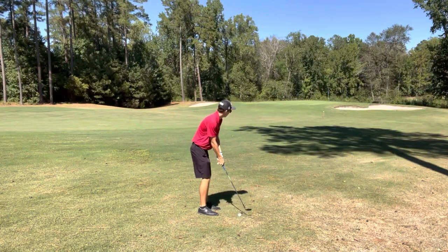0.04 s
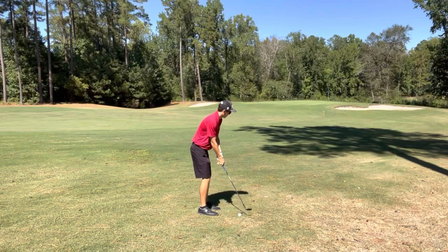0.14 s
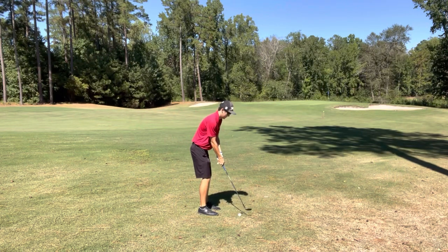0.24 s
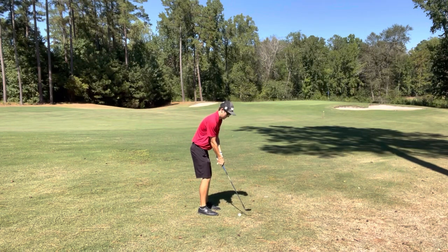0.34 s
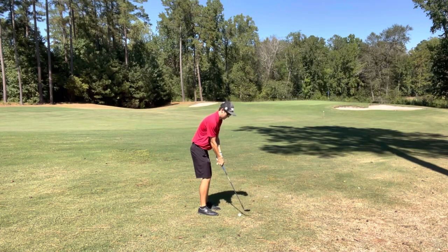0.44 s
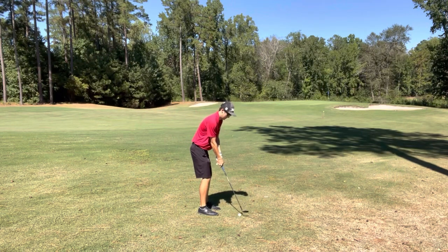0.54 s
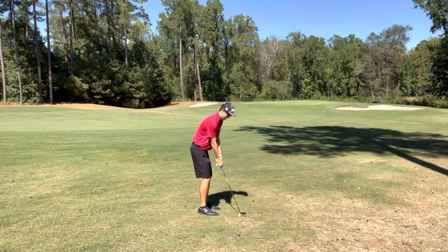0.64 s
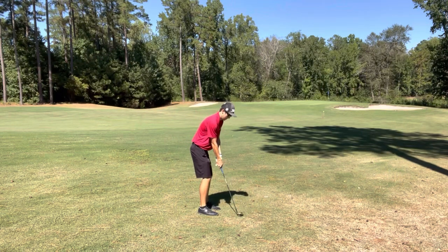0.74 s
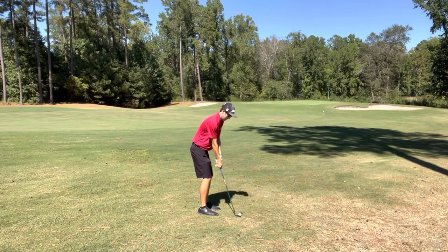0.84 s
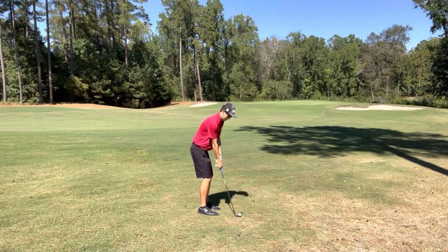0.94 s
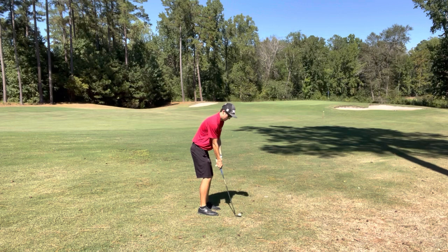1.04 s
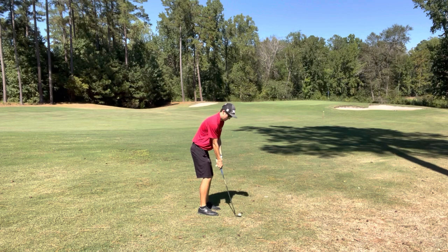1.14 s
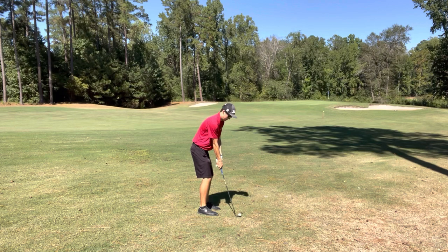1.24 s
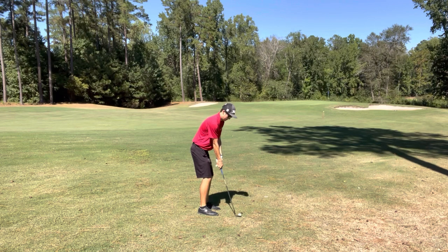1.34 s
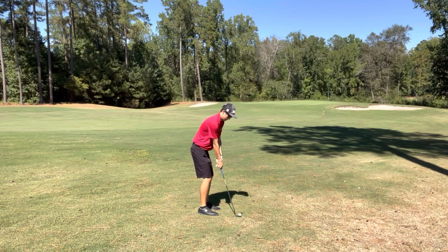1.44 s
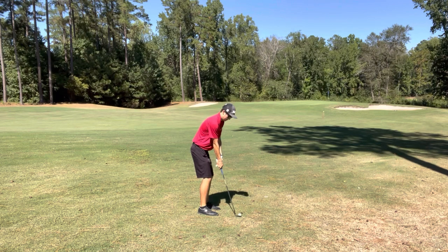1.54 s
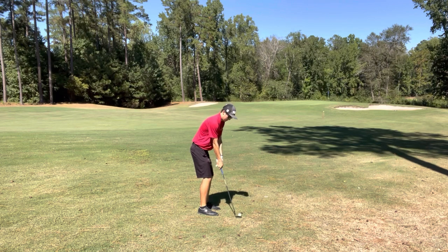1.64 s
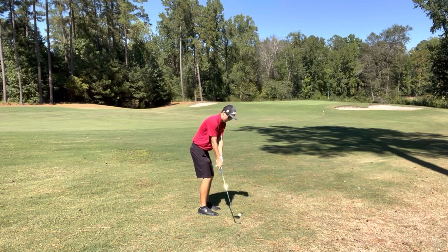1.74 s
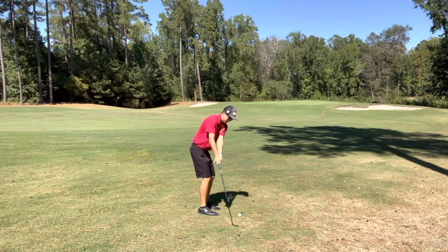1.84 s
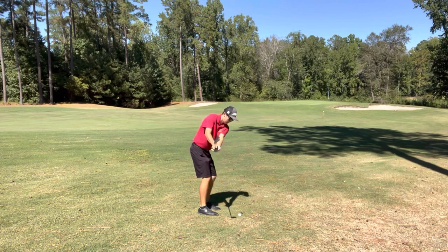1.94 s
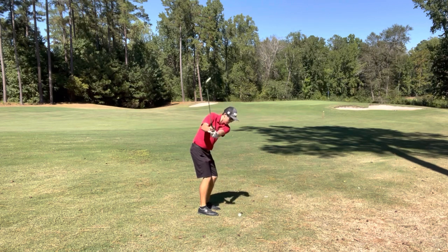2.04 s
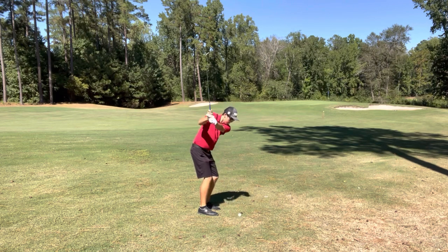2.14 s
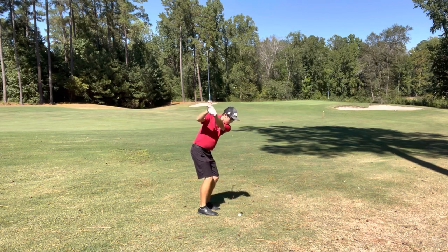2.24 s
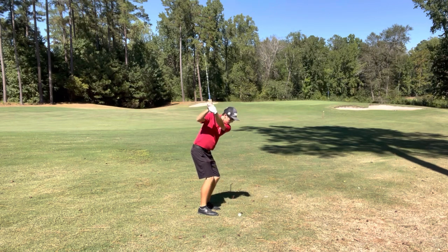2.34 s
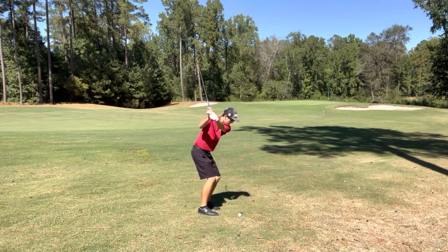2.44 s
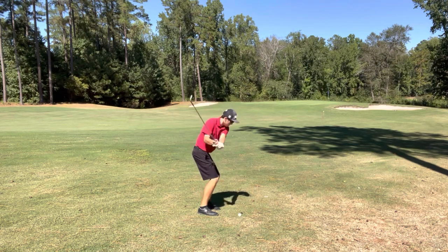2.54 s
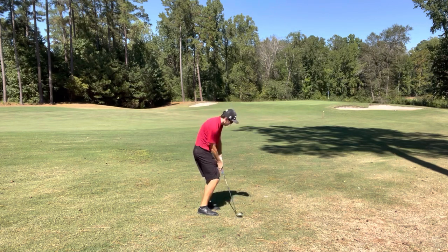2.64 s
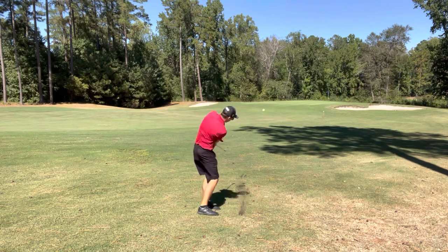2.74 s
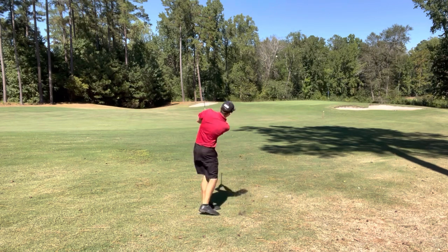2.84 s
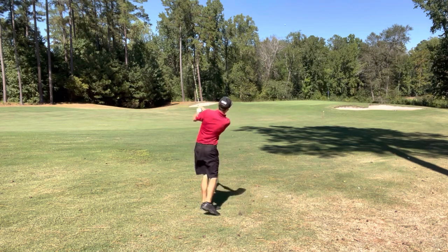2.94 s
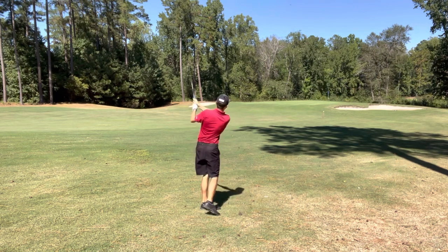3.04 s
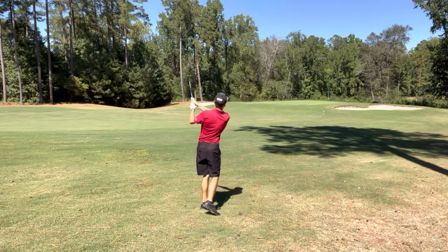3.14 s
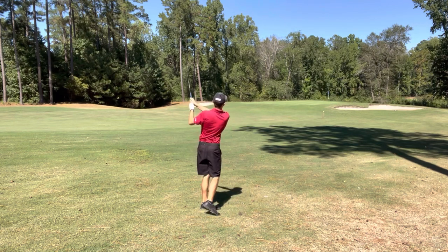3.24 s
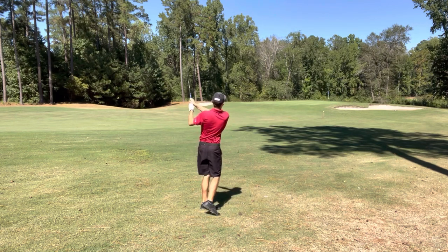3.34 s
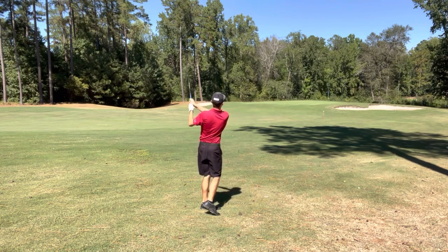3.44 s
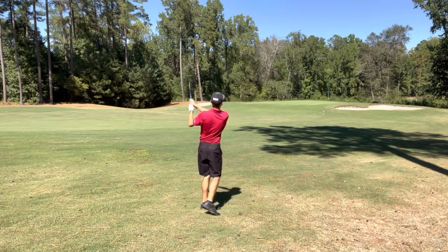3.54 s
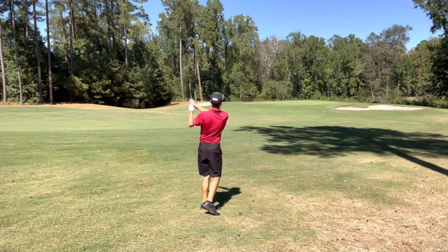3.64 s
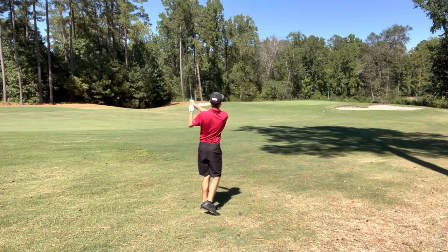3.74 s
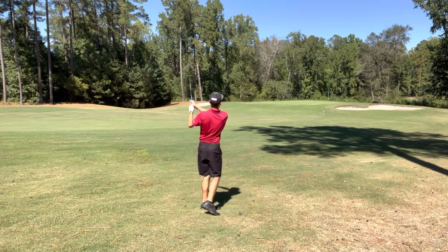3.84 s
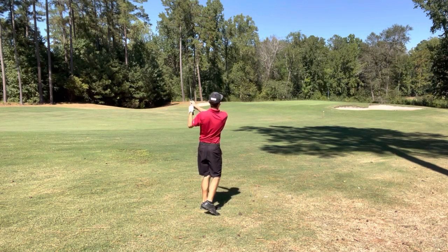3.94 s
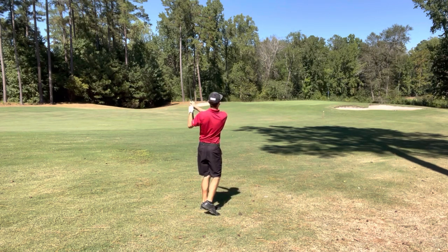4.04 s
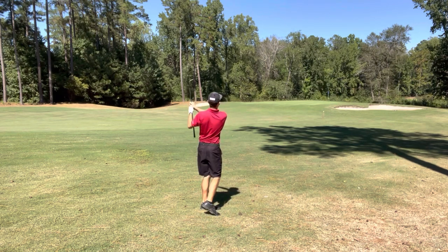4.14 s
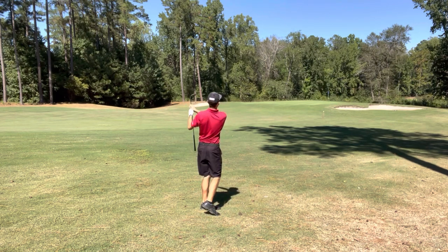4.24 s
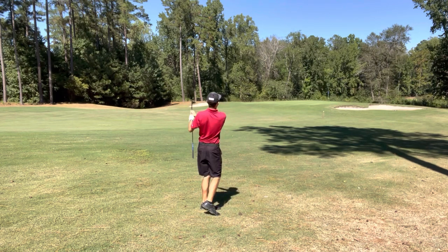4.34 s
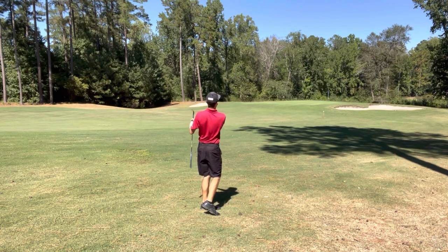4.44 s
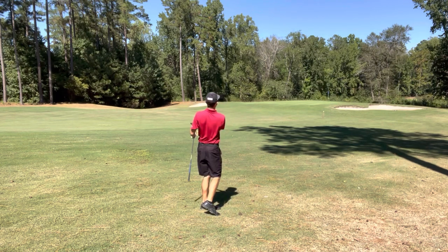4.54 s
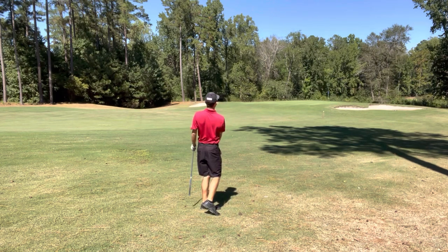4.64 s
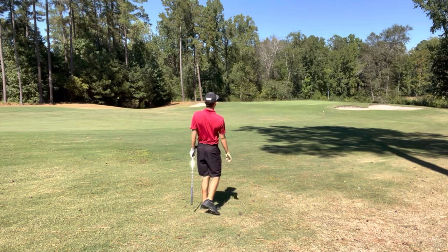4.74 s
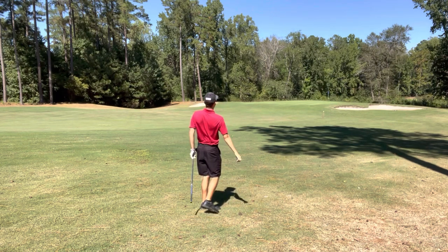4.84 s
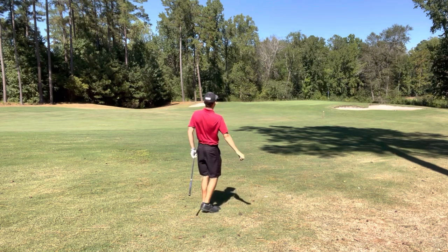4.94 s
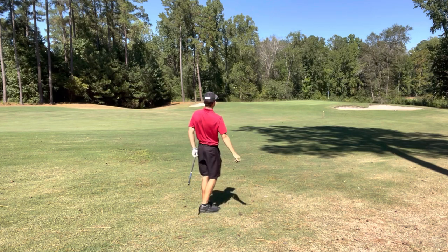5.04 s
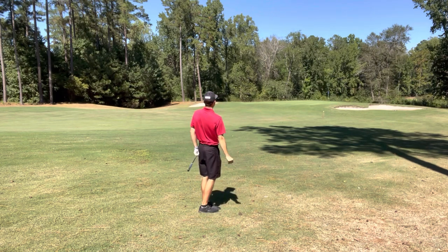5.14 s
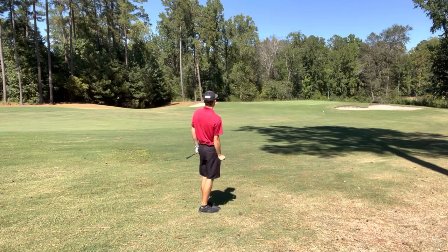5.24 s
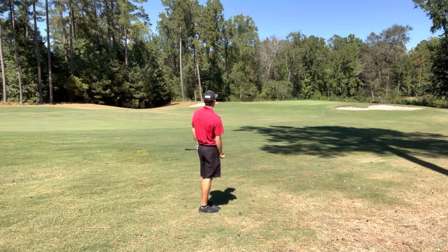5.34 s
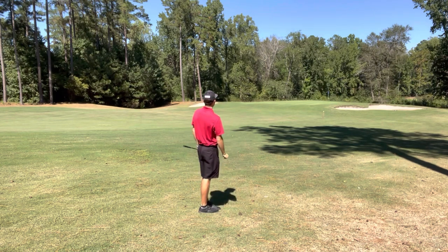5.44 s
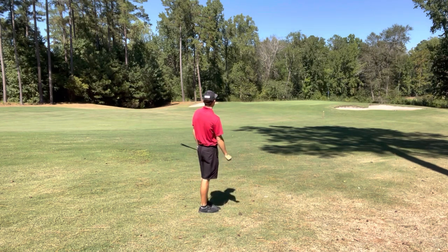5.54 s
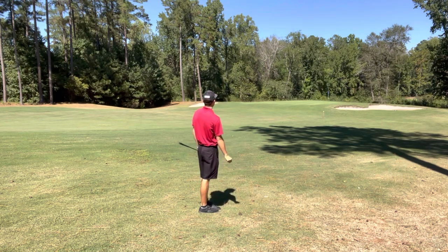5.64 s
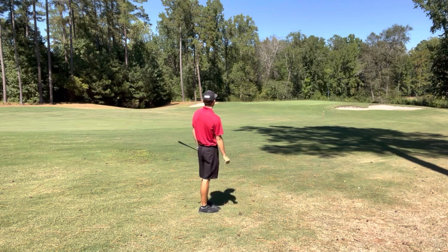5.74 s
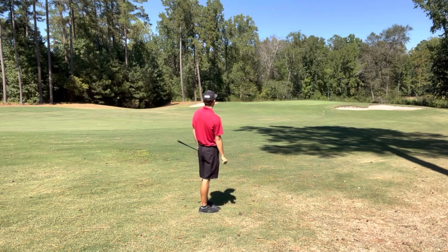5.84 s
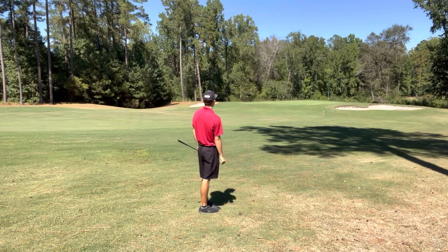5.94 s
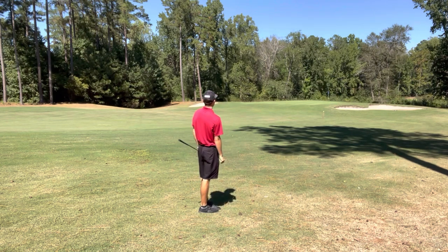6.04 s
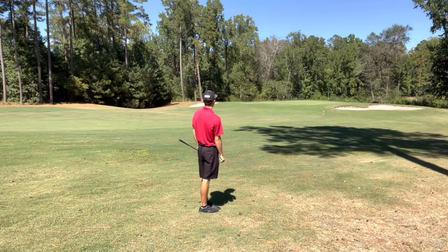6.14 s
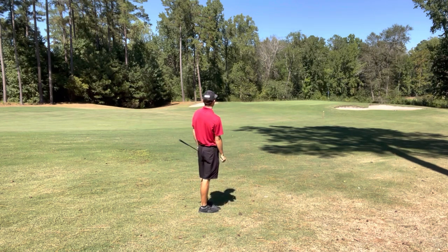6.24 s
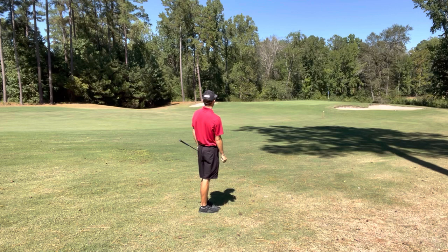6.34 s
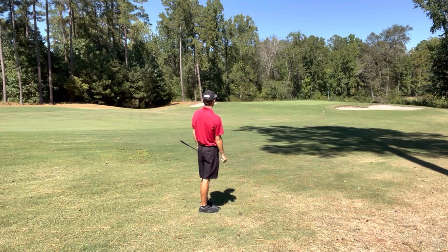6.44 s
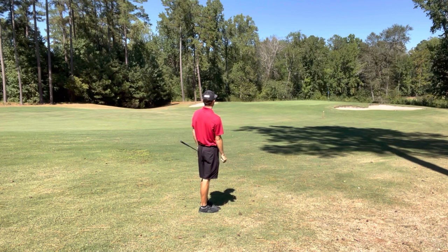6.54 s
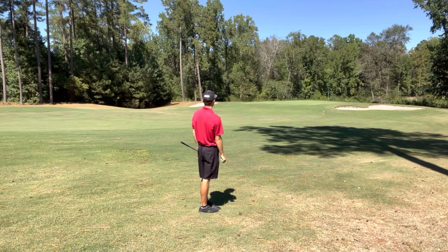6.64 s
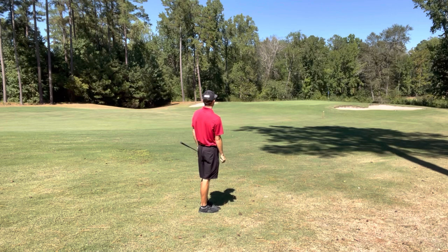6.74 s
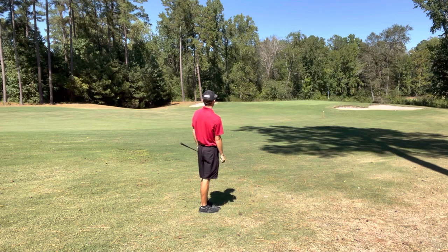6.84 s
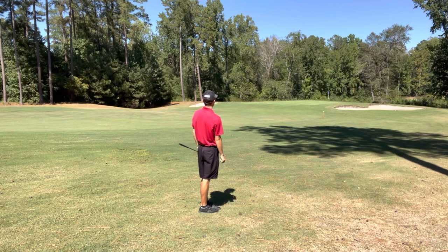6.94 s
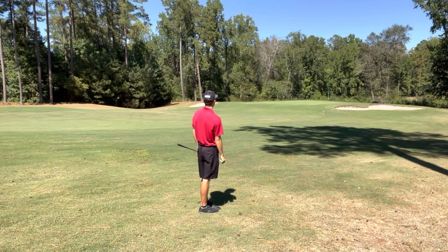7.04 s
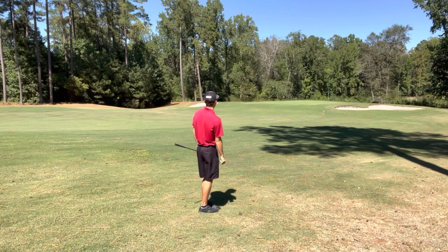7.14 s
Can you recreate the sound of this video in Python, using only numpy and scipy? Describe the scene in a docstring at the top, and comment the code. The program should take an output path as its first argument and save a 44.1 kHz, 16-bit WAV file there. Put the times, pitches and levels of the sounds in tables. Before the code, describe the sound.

A golf iron cracks a ball off turf with a sharp metallic click and brief swish, over low road hum, insect hiss and distant birds.

```python
"""Golf shot on an open fairway

An iron strikes a ball off the turf a few metres from a phone: short pushes ring decaying modes.
The swish, turf spray and rustles are shaped noise; later the shaft slaps into the golfer's hand.
Birds whistle and chirp far off as fluttering sines, smeared by echoes among the trunks.
Insects hiss in the trees and leaves in the breeze as flickering noise; behind them lies road hum,
and two distant engines drone as low tones with an octave."""
import sys
import numpy as np
from scipy import signal
from scipy.fft import rfft, irfft
from scipy.io import wavfile
from scipy.ndimage import uniform_filter1d

SR = 44100
rng = np.random.default_rng(int(sys.argv[2]) if len(sys.argv) > 2 else 0)


def pcm_store(signal):
    """Save signal as 16-bit PCM."""
    levels = np.round(np.clip(np.atleast_2d(signal), -1, 1) * 32767)
    wavfile.write(sys.argv[1], SR, levels.astype(np.int16).T)


N = 317520


def undb(db):
    """Decibel law: 20 dB is a factor of ten in amplitude."""
    return 10 ** (np.asarray(db) / 20)


def level(x, db):
    """Root-mean-square measure: scale a signal to an rms level."""
    return x * undb(db) / np.sqrt(np.mean(x ** 2))


def curve(rows):
    """Linear interpolation: the columns of a timed table, sample by sample."""
    time_s, *columns = np.transpose(rows)
    return [np.interp(np.arange(N) / SR, time_s, column) for column in columns]


def coloured(points, size):
    """Spectral shaping: white noise filtered to (freq_hz, density_db) points, then set to rms 1."""
    point_hz, point_db = np.transpose(points)
    freq_hz = np.maximum(np.fft.rfftfreq(size, 1 / SR), 1)
    gain = undb(np.interp(np.log(freq_hz), np.log(point_hz), point_db))
    white = rng.standard_normal(size)
    return level(irfft(rfft(white) * gain, size), 0)


def walk(rate):
    """Slow random modulation: levels held 1 / rate s and slewed twice, with a spread near 1."""
    hold = int(SR / rate)
    steps = np.repeat(rng.standard_normal(N // hold + 1), hold)
    return 1.253 * uniform_filter1d(uniform_filter1d(steps, hold), hold)[:N]


def bands(points, low_hz, steps, swell_db, flicker_db, rate):
    """Independent modulation: noise bands, `steps` to the octave, flicker alone about swell_db(hz)."""
    spectrum, out = rfft(coloured(points, N)), 0
    place = steps * np.log2(np.maximum(np.fft.rfftfreq(N, 1 / SR), low_hz) / low_hz)
    for k in range(11):
        crossfade = np.cos(np.pi / 2 * np.clip(place - k, -1, 1)) ** 2
        band = irfft(spectrum * crossfade, N)
        out = out + band * undb(swell_db(low_hz * 2 ** (k / steps)) + flicker_db * walk(rate))
    return out


def add(out, x, start_s):
    """Superposition: mix x into out from a start time."""
    i = int(start_s * SR)
    out[..., i:i + x.shape[-1]] += x[..., :N - i]


def stereo(mid, side):
    """Sum and difference: left is mid plus side, right is mid minus side."""
    return np.array([mid + side, mid - side])


# stereo width against frequency, narrowing in the treble: freq_hz, width_db
PORT_WIDTH = [(3000, 0.5), (8000, -5), (13000, -7), (14200, -31)]
PORT_LAG_S = 4.5e-5  # near sounds reach the right port this much before the left


def ports(x):
    """Path difference at two ports: the sum loses 11 kHz, the difference loses the bass."""
    freq_hz = np.fft.rfftfreq(N, 1 / SR)
    turn = np.pi * freq_hz * PORT_LAG_S
    width = undb(np.interp(freq_hz, *np.transpose(PORT_WIDTH)))
    spectrum = rfft(x)
    mid = irfft(spectrum * np.cos(turn), N)
    side = irfft(spectrum * np.sin(turn) * width * -1j, N)
    return stereo(mid, side)


# spectrum of the crack of noise at each contact: freq_hz, density_db
CRACK_COLOUR = [(200, -13), (800, 2), (2500, -1), (5000, -1.5), (6600, -8.5), (8500, 5.5), (11500, -1.5),
                (13500, -4), (15500, -4.5), (16400, -13.5)]
CRACK_T60_S = 0.016


def struck(blows, modes):
    """Modal excitation: a short push rings the modes, neighbours in opposite sense, with a noise crack."""
    out, t = np.zeros(N), np.arange(SR // 4) / SR
    pitch_hz, mode_db, t60_s = np.transpose(modes)[:, :, None]
    rings = undb(mode_db - 60 * t / t60_s) * np.sin(2 * np.pi * pitch_hz * t)
    signs = -(-1) ** np.arange(len(modes))
    for start_s, ring_db, push_ms, crack_db in blows:
        push = np.hanning(int(push_ms * SR / 1000) + 3)
        shares = undb(1.2 * rng.standard_normal(len(modes))) * signs
        ring = np.convolve(shares @ rings, push / push.sum())[:len(t)]
        crack = undb(crack_db - 60 * t / CRACK_T60_S) * coloured(CRACK_COLOUR, len(t))
        add(out, undb(ring_db) * ring + crack, start_s)
    return out


# a faint short sound just before the hit; the club meets the ball, skips through the turf:
# start_s, ring_db, push_ms, crack_db
BLOWS = [(2.6755, -36, .4, -40), (2.6777, -16, .15, -21), (2.6796, -23, .1, -23), (2.6826, -20, .2, -26),
         (2.6844, -25, .3, -30), (2.686, -27, .4, -33)]
# the divot drops back: start_s, ring_db, push_ms, crack_db
DIVOT = [(2.714, -41, .25, -48)]
# ringing of the club head: pitch_hz, level_db, t60_s
CLUB_MODES = [(589, -16.5, 0.02), (769, -3, 0.051), (932, -6, 0.025), (1250, -2, 0.024),
              (1532, -2.5, 0.0215), (1827, 0, 0.0238), (1963, 2.5, 0.011), (2490, -8.5, 0.025),
              (3150, -6.5, 0.022), (4000, -8, .016), (4730, -6, 0.023), (5096, -6, 0.021), (7920, 9, 0.011)]


def club_strike():
    """Impact of a metal body: blows and divot ring one set of heavily damped modes."""
    return struck([*BLOWS, *DIVOT], CLUB_MODES)


# the sole thumps the turf: start_s, ring_db, push_ms, crack_db
THUMP = [(2.6815, -22.5, 1.3, -65)]
# resonances of the ground: pitch_hz, level_db, t60_s
GROUND_MODES = [(111.4, -10.5, 0.068), (166.4, -3, 0.083), (244.6, -5.5, 0.081), (379.4, -2.5, 0.049),
                (518.5, -11, 0.061)]


def turf_thump():
    """Low-pass effect of a long contact: a slow push rings the deep modes of the ground."""
    return struck(THUMP, GROUND_MODES)


# colour of the swish and of the torn turf: freq_hz, density_db
SWISH_COLOUR = [(150, -5), (500, 1), (1500, -8), (3000, -10.5), (9000, -19), (11000, -24), (13500, -20.5),
                (16400, -30)]
SWISH_DB, SWISH_RISE_S = -47.5, 0.045
BURST_DB, BURST_FALL_S, RAIN_DB, RAIN_S = -49, 0.042, -59.5, 0.26


def swish():
    """Turbulence noise: air off the shaft up to the ball, then a burst and a gritty rain of turf."""
    t = np.arange(N) / SR - BLOWS[1][0]  # zero at the ball
    after = np.maximum(t, 0)
    before = undb(SWISH_DB + walk(150)) * np.exp(-(t / SWISH_RISE_S) ** 2)
    burst = undb(BURST_DB) * np.exp(-after / BURST_FALL_S)
    rain = undb(RAIN_DB) * np.exp(-(after / RAIN_S) ** 2)
    shape = np.where(t < 0, before, (burst + rain) * undb(2 * walk(220)))
    near = ports(shape * coloured(SWISH_COLOUR, N))
    spread = undb(-7.5) * shape * coloured(SWISH_COLOUR, N)
    return near + stereo(0, spread)


# the shaft slaps into the hand: start_s, ring_db, push_ms, crack_db
SLAP = [(5.2389, -34, .05, -42)]
# ringing of the shaft: pitch_hz, level_db, t60_s
SHAFT_MODES = [(1660, 2, .012), (2300, 0, .012), (3250, -6, .011), (4880, -2, .009), (6600, -9, .006),
               (8150, 2, .007)]


def shaft_slap():
    """High-pass filtering: the slap keeps its bright ring and little bass."""
    high_pass = signal.butter(3, 1234, "high", fs=SR, output="sos")
    return signal.sosfilt(high_pass, struck(SLAP, SHAFT_MODES))


# small hard ticks of grit and metal: start_s, pitch_hz, level_db, t60_s
TICKS = [(2.7273, 4950, -41, .011), (2.727, 8500, -43, .007), (2.727, 11000, -48, .005),
         (2.727, 13500, -50, .005), (2.921, 8580, -54, 0.014), (3.5947, 9005, -43, .012),
         (3.5947, 13000, -52, .006)]


def ticks():
    """Free vibration of small hard bodies: brief high sines with exponential decay."""
    out, t = np.zeros(N), np.arange(SR // 20) / SR
    onset = 1 - np.exp(-t / 0.0001)
    for start_s, pitch_hz, level_db, t60_s in TICKS:
        decay = undb(level_db - 60 * t / t60_s)
        add(out, decay * onset * np.sin(2 * np.pi * pitch_hz * t), start_s)
    return out


# cloth and grass rustles, timed at the peak:
# peak_s, rise_s, fall_s, level_db, brightness_db (scales the treble points)
RUSTLES = [(1.675, .035, .04, -74, 4), (2.735, .02, .1, -70, 3), (3.6, .015, .06, -72, 3),
           (4.815, .025, .08, -74, 2), (4.96, .1, .05, -70.5, 0)]
RUSTLE_SIDE_DB = -2.5


def rustles():
    """Friction noise: bursts of fine crackle, near 11 kHz chiefly from the sides."""
    out, lead = np.zeros((2, N)), SR // 5
    t = np.arange(-lead, 2 * lead) / SR
    for peak_s, rise_s, fall_s, level_db, tilt_db in RUSTLES:
        front = [(1000, -32.0), (2000, 3.5), (9000, 2.03 * tilt_db), (10500, -16.0),
                 (11800, -24.5), (13000, 3.17 * tilt_db), (16400, -23.0)]
        across = [(1000, -31.0), (2000, -4.5), (12500, 2.63 * tilt_db), (14000, -37.0)]
        swell = np.exp(np.where(t < 0, -(t / rise_s) ** 2, -t / fall_s))
        shape = swell * undb(level_db + 1.5 * walk(300)[:len(t)])
        mid = coloured(front, len(t))
        side = undb(RUSTLE_SIDE_DB) * coloured(across, len(t))
        add(out, shape * stereo(mid, side), peak_s + t[0])
    return out


def note(pitch_hz, gain, rough_db):
    """Scattering in foliage: a near sine whose size and pitch flutter on the way."""
    flutter, waver = (walk(150)[:len(pitch_hz)] for _ in range(2))
    phase = 2 * np.pi * np.cumsum(pitch_hz + 32 * waver) / SR
    return np.sqrt(2) * gain * undb(rough_db * flutter) * np.sin(phase)


WHISTLE_SAG_HZ_S, WHISTLE_FADE_DB_S = 300, 51.5
WHISTLE_ATTACK_S, WHISTLE_HOLD_S = .035, .12


def whistle(length_s, start_hz, top_hz, rise_s, bend, level_db):
    """Frequency glide: pitch climbs to a top and sags; the level swells, holds and fades."""
    t = np.arange(int(length_s * SR)) / SR
    climb_hz = (top_hz - start_hz) * np.minimum(t / rise_s, 1) ** bend
    pitch_hz = start_hz + climb_hz - WHISTLE_SAG_HZ_S * np.maximum(t - rise_s, 0)
    pitch_hz = uniform_filter1d(pitch_hz, size=SR // 60, mode="nearest")
    fade_db = WHISTLE_FADE_DB_S * np.maximum(t - WHISTLE_ATTACK_S - WHISTLE_HOLD_S, 0)
    edge = np.clip(np.minimum(t / WHISTLE_ATTACK_S, (length_s - t) / .011), 0, 1)
    return note(pitch_hz, edge * undb(level_db - fade_db), 4.5)


def chirp(length_s, start_hz, middle_hz, end_hz, level_db):
    """Parabolic frequency sweep: pitch passes three points under one smooth swell."""
    u = np.linspace(0, 1, int(length_s * SR))
    bend_hz = middle_hz - (start_hz + end_hz) / 2
    pitch_hz = start_hz + (end_hz - start_hz) * u + 4 * bend_hz * u * (1 - u)
    return note(pitch_hz, undb(level_db) * np.sin(np.pi * u ** .6) ** .7, 4)


# rising whistles of one bird:
# start_s, length_s, start_hz, top_hz, rise_s, bend (under 1 = early), level_db
WHISTLES = [(0.866, 0.25, 6080, 6760, .12, .9, -65), (1.17, 0.4, 5520, 6560, .145, .95, -63),
            (6.048, 0.26, 5980, 6760, .14, 1.05, -65), (6.372, 0.25, 5400, 6700, .15, .65, -63)]
# chirps of further birds: start_s, length_s, start_hz, middle_hz, end_hz, level_db, echo_db
CHIRPS = [(.322, .05, 2340, 2330, 2310, -64, 2), (.355, .1, 1960, 1890, 1940, -67, -2),
          (.66, .055, 2300, 2050, 1880, -70, 1), (1.915, .03, 4000, 4030, 3980, -78, -4),
          (2.035, .032, 4350, 4620, 3950, -78, -6), (2.085, .028, 3950, 4350, 4000, -77, -6),
          (2.138, .026, 3950, 4550, 3950, -78, -6), (2.228, .028, 4100, 4250, 4350, -79, -6),
          (2.885, .04, 3750, 3500, 3250, -72, 6), (2.93, .12, 3550, 3480, 3500, -77, 3),
          (3.333, .04, 3900, 4080, 3900, -77, 1), (3.585, .04, 2200, 2050, 1850, -75, 2),
          (3.603, .035, 3000, 2780, 2620, -73, 2), (4.818, .022, 3650, 3700, 3400, -80, -6),
          (4.868, .028, 3650, 4200, 3750, -77, -6), (5.556, .075, 2680, 1980, 1740, -67, 4),
          (5.587, .042, 3080, 2780, 2480, -71, 2), (5.873, .05, 2560, 2170, 1900, -67, 6),
          (5.915, .093, 1900, 1960, 2250, -67, -3), (6.21, .085, 2660, 2500, 2570, -69, 2),
          (6.235, .105, 2420, 2100, 1820, -75, 6)]
TREES_T60_S, WHISTLE_ECHO_DB = .42, -2
TRUNK_ECHO_S, TRUNK_ECHO_DB = 0.052, -8.5  # one clear echo of the whistles


def birds():
    """Diffuse reverberation: calls convolved with decaying noise, as by echoes among the trunks."""
    direct, sent = np.zeros(N), np.zeros(N)
    for start_s, *shape in WHISTLES:
        call = whistle(*shape)
        add(direct, call, start_s)
        add(direct, call * undb(TRUNK_ECHO_DB), start_s + TRUNK_ECHO_S)
        add(sent, call * undb(WHISTLE_ECHO_DB), start_s)
    for start_s, *shape, echo_db in CHIRPS:
        call = chirp(*shape)
        add(direct, call, start_s)
        add(sent, call * undb(echo_db), start_s)
    out, t = direct * np.array([[1], [.7]]), np.arange(SR // 2) / SR
    # each of four crowns throws back its own blur, and moving leaves smear the pitch
    for crown in range(4):
        envelope = undb(-60 * t / TREES_T60_S) * (1 - np.exp(-t / 0.012))
        tail = rng.standard_normal((2, len(t))) * envelope
        tail /= 2 * np.sqrt(np.sum(tail ** 2, axis=1, keepdims=True))
        stirred = sent[None] * (.5 + .85 * walk(350))
        out = out + signal.fftconvolve(stirred, tail, axes=1)[:, :N]
    return out


# crickets near 3.5 kHz, cicadas at 5.5 to 8.5 kHz, faint hiss above; in front and across:
# freq_hz, density_db
CHORUS_MID = [(2900, -29), (3300, -6), (3700, -5.5), (4100, -28.5), (5300, -17), (6000, -2), (7000, 1),
              (8100, -2), (8700, -24), (12200, -66.5), (13000, -12.5), (14800, -8), (15700, -17.5),
              (16000, -44)]
CHORUS_SIDE = [(2900, -26), (3300, -5.5), (3700, -2.5), (4100, -20), (5300, -14), (6000, -2.5),
               (7000, -2.5), (8200, -14), (8700, -25), (9600, -32.5), (10200, -14.5), (13500, -13.5),
               (14000, -48.5)]
# uneven level of the hiss above 9.5 kHz: time_s, level_db
HIGH_HISS = [(0, -8.5), (1.62, -1.5), (2.1, -10), (4.4, -3), (5.5, -8.5), (6.3, -5.5), (7.2, -12)]
CHORUS_DB, CRICKETS_DB = -68.5, -0.1  # the crickets are set against the chorus
CHORUS_WANDER_DB = 0  # at 0 the chorus as a whole holds steady


def insects_and_high_hiss():
    """Incoherent sum: noise bands that flicker quickly stand for many callers and the hiss above them."""
    chorus_db = CHORUS_DB + CHORUS_WANDER_DB * walk(1.6)
    high_hiss_db, cricket_db = curve(HIGH_HISS)[0], CRICKETS_DB + walk(1.7)

    def swell_db(hz):
        """Band weighting: the high hiss and the crickets each follow a slow level."""
        return chorus_db + (hz > 9500) * high_hiss_db + (hz < 4500) * cricket_db

    mid, side = (bands(points, 2830, 4, swell_db, 1.8, 36) for points in (CHORUS_MID, CHORUS_SIDE))
    return stereo(mid, undb(-4.5) * side)


# breeze in the leaves freshens: time_s, level_db
LEAVES = [(0, -89), (1.2, -81), (3.2, -87), (4.7, -86), (5.0, -78.5), (7.2, -74)]
# colour of the leaf hiss: freq_hz, density_db
LEAF_COLOUR = [(2000, -26), (2600, -12), (4200, 6.5), (5500, 8), (6200, -31.5)]


def leaves():
    """Uncorrelated channels: a soft, wide hiss that flutters with the breeze."""
    gain = undb(curve(LEAVES)[0] + 1.4 * walk(16))
    return gain * np.array([coloured(LEAF_COLOUR, N), coloured(LEAF_COLOUR, N)])


# a far engine at steady speed: time_s, level_db
STEADY_ENGINE = [(0.0, -50.5), (1.16, -49), (1.26, -40.5), (2.93, -57), (3.57, -53), (3.69, -65.5),
                 (4.01, -43), (4.91, -60.5), (5.25, -47.5), (5.57, -68), (6.84, -49), (6.94, -68),
                 (7.12, -49), (7.2, -58)]
STEADY_HZ = 84  # firing rate
# an engine that slows, drops a gear near 2.8 s and slows again: time_s, firing_hz, level_db
GLIDING_ENGINE = [(0, 70.3, -50), (.45, 67.66, -50.5), (.8, 67.34, -48), (1.2, 66.14, -54),
                  (1.9, 59.85, -42.5), (2.45, 57.7, -57.5), (2.72, 58, -46), (3.0, 72.9, -49),
                  (3.5, 69.8, -45), (4.2, 66.2, -47), (4.8, 61.34, -49.5), (5.4, 55.36, -50.5),
                  (5.75, 54.26, -70), (6.0, 52.03, -45.5), (6.36, 50.6, -53.5), (6.6, 51.1, -65),
                  (7.2, 50.6, -57.5)]


def engine(firing_hz, level_db, octave_db):
    """Harmonic tone through moving air: firing tone and octave waver in size and pitch on the way."""
    phase = 2 * np.pi * np.cumsum(firing_hz + 0.87 * walk(10)) / SR
    gain = np.sqrt(2) * undb(level_db + 2.9 * walk(13))
    octave = undb(octave_db + 4.1 * walk(5.29)) * np.sin(2 * phase)
    return gain * (np.sin(phase) + octave)


def engines():
    """Superposition of two tones: a steady engine and a gliding one."""
    steady = engine(STEADY_HZ, *curve(STEADY_ENGINE), -26.0)
    return steady + engine(*curve(GLIDING_ENGINE), -19.0)


# road hum and tyre hiss, in front and across: freq_hz, density_db
ROAD_MID = [(15, -67), (25, -34), (44, -11.5), (71, -3.5), (90, -5), (108, -5.5), (132, -10.5),
            (161, -17.5), (188, -19), (293, -28), (430, -30.5), (743, -26), (1200, -37), (2810, -49.5),
            (5000, -63), (6500, -77.5), (11000, -120)]
ROAD_SIDE = [(15, -57.5), (25, -30), (44, -11.5), (71, -6), (108, -7), (129, -8.5), (293, -20), (499, -20),
             (665, -9.5), (1540, -23.5), (2510, -40.5), (3590, -42), (5000, -54.5), (6500, -68),
             (11000, -120)]
# the traffic thins out unevenly: time_s, hum_db, hiss_db (tyres above 1.2 kHz, added to the hum)
TRAFFIC = [(0, 1, 3), (.8, 0.24, 4.5), (2.5, -0.8, 2.2), (4.6, -1, -0.5), (4.9, -0.5, 0.5), (6.3, -1.9, -1),
           (7.2, -1.5, -5.5)]
ROAD_MID_DB, ROAD_SIDE_DB = -48.5, -57  # before the traffic curve and flicker


def road(points, level_db, flicker_db):
    """Broadband noise in octaves: road hum above the deepest bass follows the traffic."""
    hum_db, hiss_db = curve(TRAFFIC)

    def swell_db(hz):
        """Band weighting: the hum level acts above 80 Hz, the tyre hiss level above 1.2 kHz."""
        return (hz > 80) * hum_db + (hz > 1200) * hiss_db

    noise = bands(points, low_hz=25, steps=1, swell_db=swell_db, flicker_db=flicker_db, rate=9)
    return undb(level_db) * noise


BASS_PAN_DB = 3  # left over right


def background():
    """Level-difference panning: all the far noise and drone, with the low sounds leaning left."""
    drone = engines()
    floor = stereo(road(ROAD_MID, ROAD_MID_DB, 1.72), road(ROAD_SIDE, ROAD_SIDE_DB, 1.3))
    low_pass = signal.butter(1, 250, fs=SR, output="sos")
    bass = signal.sosfilt(low_pass, floor.mean(axis=0)) + drone
    lean = np.tanh(np.log(undb(BASS_PAN_DB)) / 2)
    return floor + insects_and_high_hiss() + leaves() + drone + stereo(0 * bass, lean * bass)


def scene():
    """Superposition: hard near sounds pass the ports, the rest carry their own stereo."""
    far = background()
    near = club_strike() + turf_thump() + shaft_slap() + ticks()
    return far + birds() + ports(near) + swish() + rustles()


def record(dry):
    """Band limiting: the phone cuts the top above 16.6 kHz with a steep low-pass."""
    low_pass = signal.ellip(10, .2, 80, 16600, fs=SR, output="sos")
    return signal.sosfilt(low_pass, dry)


dry = scene()
out = record(dry)
pcm_store(out)
```